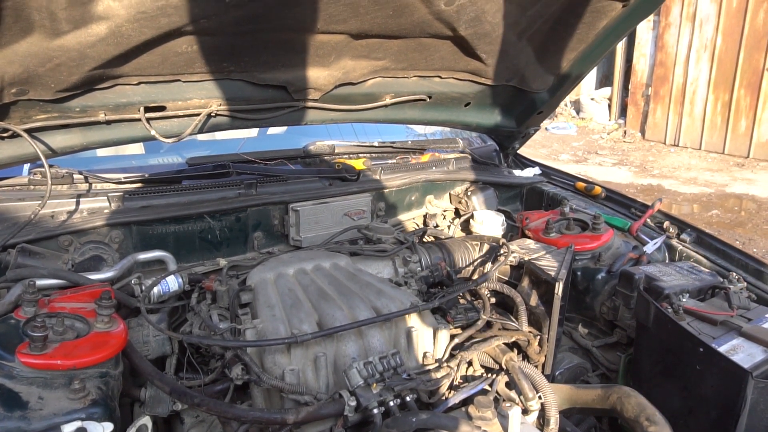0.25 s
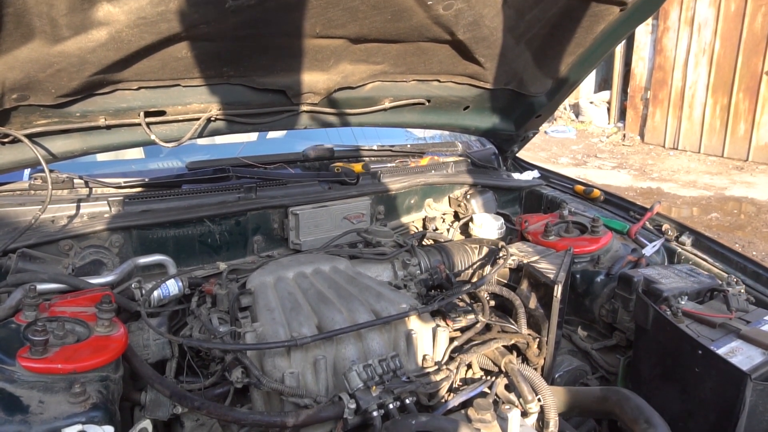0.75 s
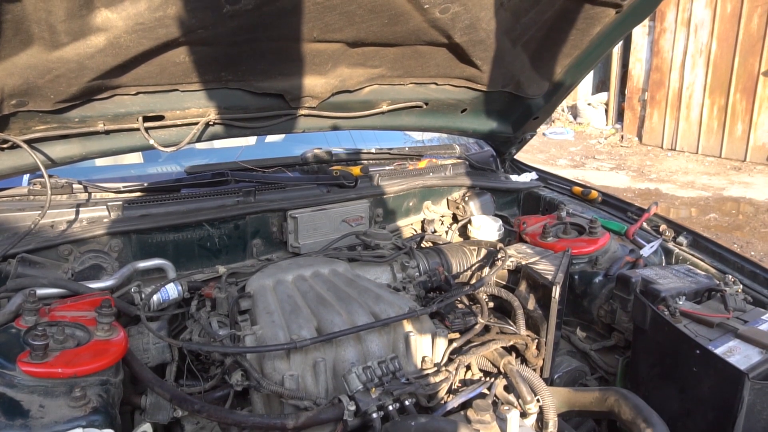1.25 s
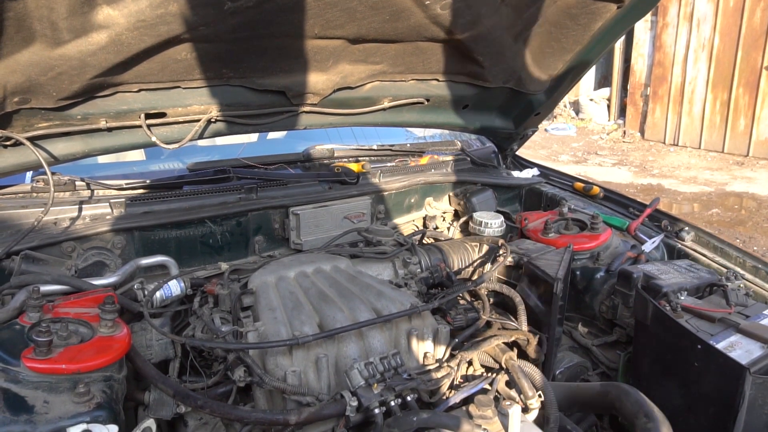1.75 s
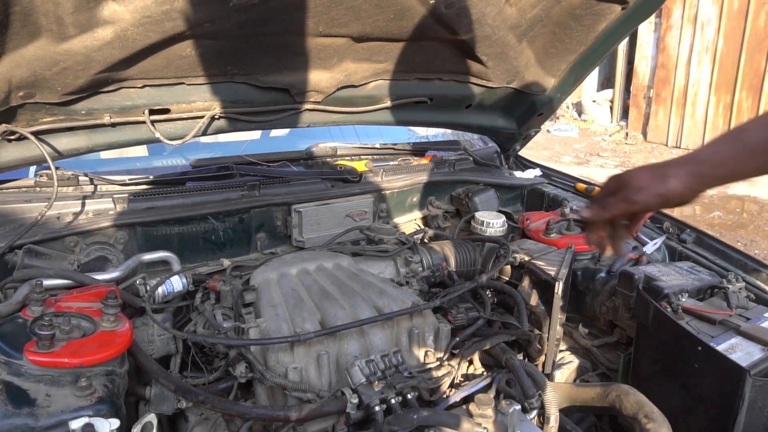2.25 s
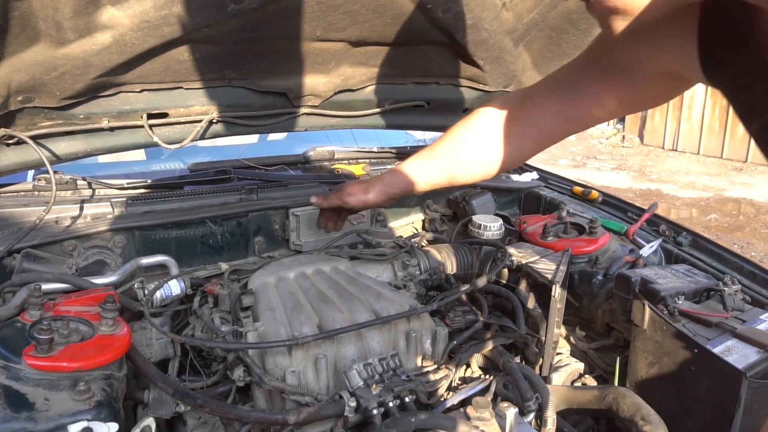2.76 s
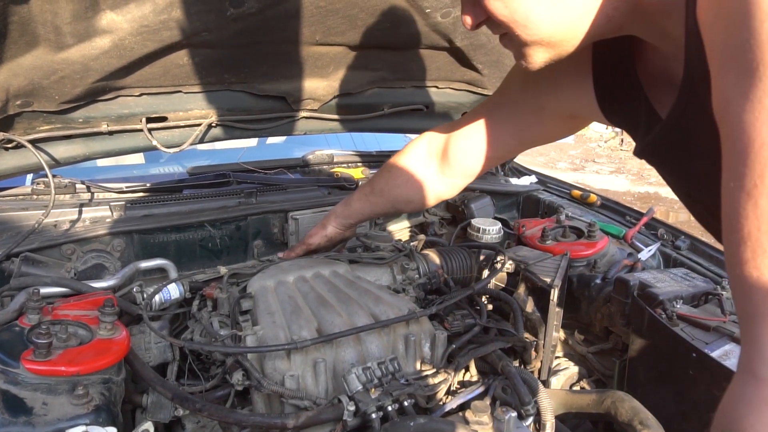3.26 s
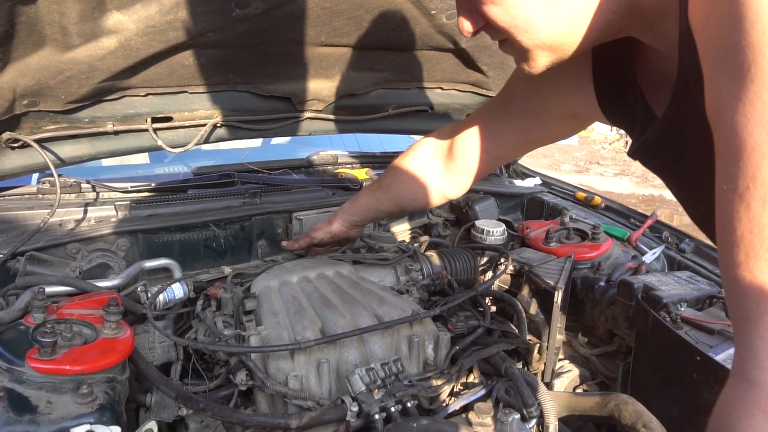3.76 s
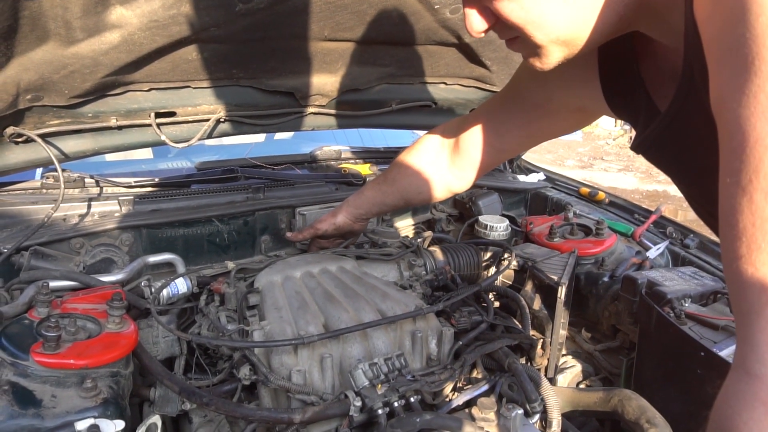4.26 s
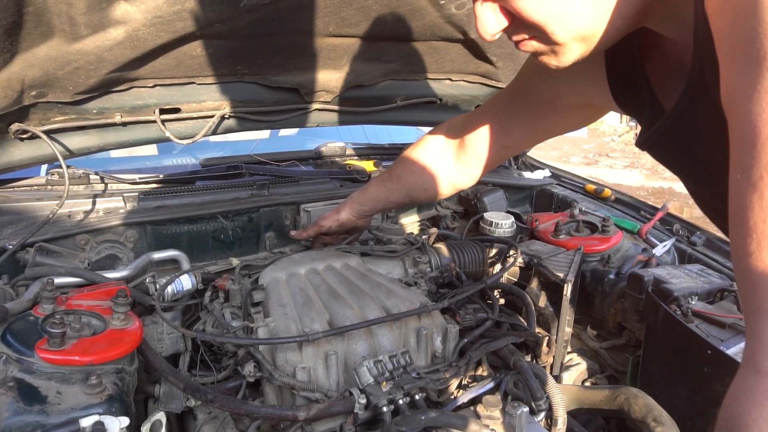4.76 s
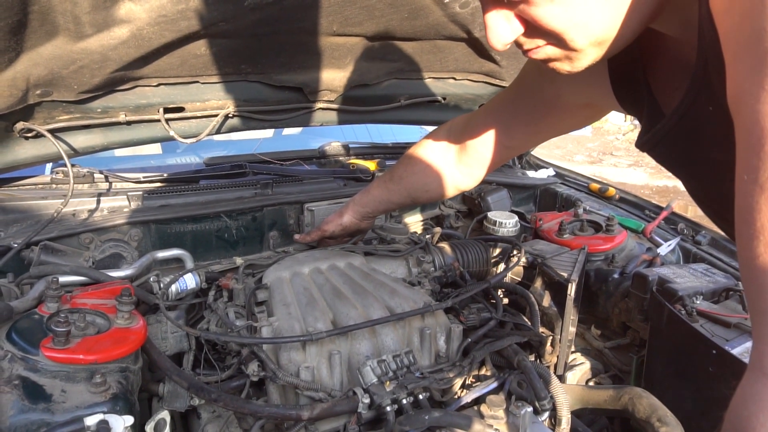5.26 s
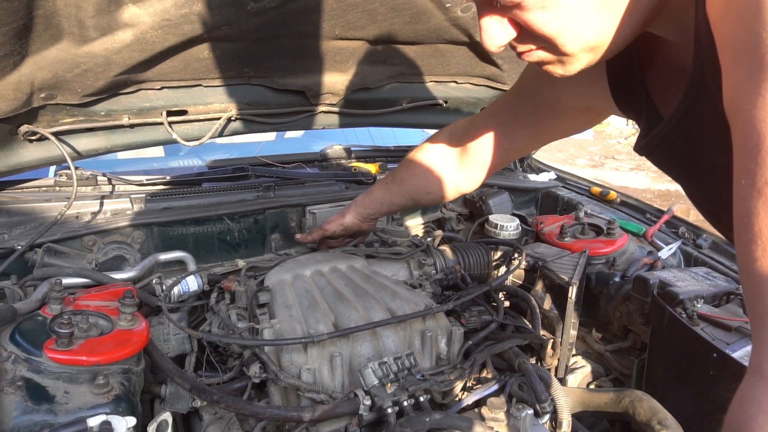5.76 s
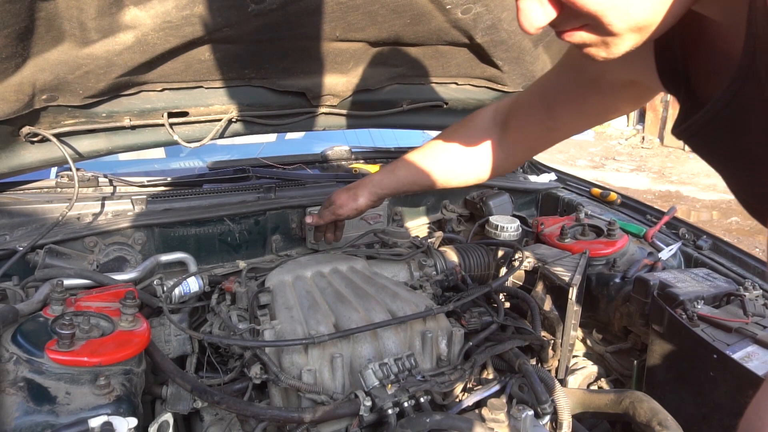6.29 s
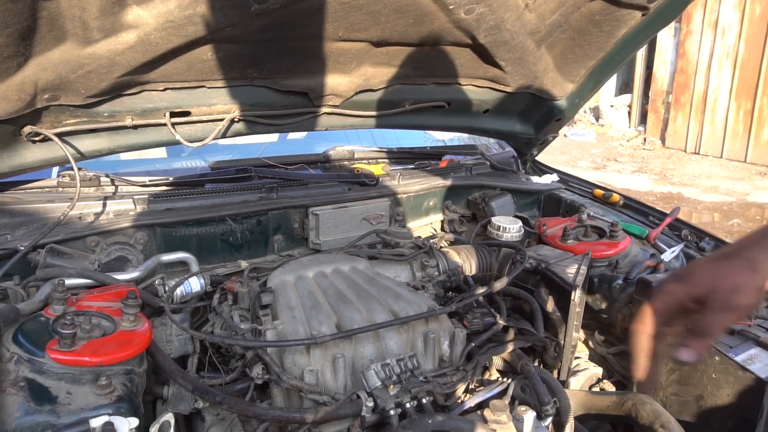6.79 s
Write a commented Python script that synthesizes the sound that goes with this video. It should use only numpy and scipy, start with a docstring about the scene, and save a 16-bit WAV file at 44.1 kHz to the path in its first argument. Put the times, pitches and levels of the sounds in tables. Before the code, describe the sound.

Heard from one close, slightly distorting microphone at an open engine bay, a car idles while its loose belt squeals with a high, wobbling whistle and a thin hiss. Past the middle the throttle opens gently and the squeal grows rough and chattering. Near the end the belt grips and goes quiet, and the engine's ticking clatter, drone and light whistling swell up in its place.

```python
"""Loose drive belt, bonnet up

Close to the open bay of an idling car, one microphone. The belt sticks and slips on its pulley, a squeal
that wobbles with every turn; as the throttle is eased open it rasps, then grips and falls silent.
The squeal overloads the microphone and holds its gain down, so the engine swells once it stops."""
import sys
import numpy as np
from scipy import signal
from scipy.fft import rfft, irfft, next_fast_len
from scipy.io import wavfile
from scipy.ndimage import uniform_filter1d

SR = 44100
rng = np.random.default_rng(int(sys.argv[2]) if len(sys.argv) > 2 else 0)


def int16_out(signal):
    """Quantize to a 16-bit WAV file."""
    q = np.round(np.clip(np.atleast_2d(signal).T, -1, 1) * 32767)
    wavfile.write(sys.argv[1], SR, q.astype(np.int16))


N = 309968
TIME = np.arange(N) / SR
IDLE_TURNS_PER_S = 10.8   # "revs" are crank turns per second above this
GRIP_S, GRIP_LENGTH_S = 6.148, .26


def from_db(db):
    """Decibels to gain."""
    return 10 ** (np.asarray(db) / 20)


def unit_rms(x):
    """Scale to unit power."""
    return x / np.sqrt(np.mean(x ** 2) + 1e-20)


def phase_of(hz):
    """Running phase in radians."""
    return 2 * np.pi * np.cumsum(hz) / SR


def ramp(start_s, length_s):
    """Rises evenly from 0 to 1 and stays there."""
    return np.clip((TIME - start_s) / length_s, 0, 1)


def bump(centre_s, width_s):
    """A bell curve in time, of height 1."""
    return np.exp(-.5 * ((TIME - centre_s) / width_s) ** 2)


def drift(hz):
    """Random wander of unit power, mostly slower than hz."""
    r = np.exp(-2 * np.pi * hz / SR)
    return unit_rms(signal.lfilter([1], [1, -2 * r, r * r], rng.standard_normal(N + SR))[SR:])


def wavering_tone(phase, waver_db, waver_hz):
    """A sine of unit power whose level wanders."""
    return unit_rms(np.sin(phase) * from_db(waver_db * drift(waver_hz)))


def coloured_noise(spectrum):
    """Noise of unit power, shaped by rows of f/Hz, level/dB."""
    hz, db = np.transpose(spectrum)
    size = next_fast_len(N)
    bins = np.maximum(np.fft.rfftfreq(size, 1 / SR), 1)
    gain = from_db(np.interp(np.log(bins), np.log(hz), db))
    return unit_rms(irfft(rfft(rng.standard_normal(size)) * gain, size)[:N])


def resonate(x, hz, width_hz):
    """A two-pole resonance."""
    r = np.exp(-np.pi * width_hz / SR)
    return signal.lfilter([1, 0, -1], [1, -2 * r * np.cos(2 * np.pi * hz / SR), r * r], x)


def filtered(x, order, hz, kind):
    """A low-, high- or band-pass filter."""
    return signal.sosfilt(signal.butter(order, hz, kind, fs=SR, output="sos"), x)


# Belt tension swinging with crank and pulleys: cycles/turn, pitch swing at idle/Hz
TENSION_SWINGS = [(.867, 13.54), (1, 27), (1.89, 34), (2, 56), (2.405, 64), (3, 20.6), (3.78, 32.73),
                  (4.24, 19.05), (5, 20.3)]
def tension_wobble(crank, speed, sag_hz=750):
    """Pitch swing in Hz, less at speed; slack lowers the tone more than tension raises it."""
    swing = sum(hz * np.sin(per_turn * crank + rng.uniform(0, 2 * np.pi))
                for per_turn, hz in TENSION_SWINGS)
    swing *= (IDLE_TURNS_PER_S / speed) ** 1.7
    return swing - (swing ** 2 - np.mean(swing ** 2)) / sag_hz


# Moments when the belt goes slack: t/s, pitch drop/Hz
SLACK_MOMENTS = [(.188, 190.2), (0.639, 230.4), (.835, 310), (1.378, 260), (1.48, 180), (1.527, 190),
                 (1.576, 170), (2.412, 270), (4.536, 230), (5.809, 270)]
def squeal_pitch(revs, grip, wobble, rasp, idle_hz=3837, sag_hz_per_rev=108, grip_rise_hz=1263):
    """The stick-slip rate sinks with revs, climbs with grip and follows the tension unless slack."""
    centre = idle_hz - sag_hz_per_rev * revs + grip_rise_hz * grip ** 1.12
    for start_s, drop_hz in SLACK_MOMENTS:
        slack = bump(start_s, width_s=.007)
        wobble = wobble * (1 - slack) - drop_hz * slack
    jitter_hz = 20 * drift(50.02) + 48 * drift(500.7) + (24 * rasp + 80 * grip) * drift(151.3)
    return centre + wobble + jitter_hz


# Echoes reaching the microphone off block, wings and bonnet: delay/s, level/dB
BAY_ECHOES = [(.0013, -2.5), (.0024, -5.5), (.0037, -6), (.0051, -5), (.0068, -4), (.0089, -6.5),
              (0.0118, -13), (.0155, -11)]
def echo_paths(sway_s=.00007):
    """Each path through the bay lengthens and shortens a little as the microphone sways."""
    return [(TIME - delay + sway_s * drift(0.91), from_db(db)) for delay, db in BAY_ECHOES]


def through_bay(size, phase, paths, window_s=0.13):
    """Echoes add to and cancel a wobbling tone, so it flutters; its mean power is held at 1."""
    echoes = sum(gain * np.interp(when, TIME, size) * np.sin(np.interp(when, TIME, phase))
                 for when, gain in paths)
    heard = size * np.sin(phase) + echoes
    return heard / np.sqrt(uniform_filter1d(heard ** 2, int(window_s * SR)) + 1e-9)


def squeal(phase, revs, grip, wobble, chop, paths, third_db=-16):
    """Three stick-slip partials; the octave grows with revs, breaks out briefly and weakens with grip."""
    octave_db = -4 + revs + 4.5 * bump(5.8, width_s=0.12) - 8 * grip
    swing = unit_rms(wobble)
    throb = from_db(0.46 * swing)   # a tighter belt sings louder
    trade = from_db(np.abs(swing))   # far off its usual pitch the fundamental yields to the octave
    partials = [(1, 0, throb / trade), (2, octave_db, throb * trade), (3, third_db, throb)]
    tone = sum(from_db(db) * through_bay(size * (1 + chop / np.sqrt(k)), k * phase, paths)
               for k, db, size in partials)
    return filtered(tone, 2, 1700, "high")   # the narrow belt radiates low side tones poorly


# Friction hiss at the pulley: f/Hz, level/dB (spectral density)
HISS_SPECTRUM = [(100, -40), (700, -1.5), (1800, -6), (4000, -6), (6000, -5), (9000, -1.5), (12000, 0),
                 (16000, -14.5)]
def friction_hiss(rasp, steady_db=-27, rasp_db=-10, flicker_db=4):
    """The sliding belt gives a flickering hiss, louder while its ribs chatter."""
    level = from_db(steady_db) + from_db(rasp_db) * rasp
    return level * coloured_noise(HISS_SPECTRUM) * from_db(flicker_db * drift(84))


def belt(crank, speed, level_db=4):
    """The slipping belt squeals, hisses and rasps, then dies away ever faster as it grips."""
    revs = speed - IDLE_TURNS_PER_S
    grip = ramp(GRIP_S, GRIP_LENGTH_S)
    rasp = rasp_depth(revs)
    wobble = tension_wobble(crank, speed)
    paths = echo_paths()
    phase = phase_of(squeal_pitch(revs, grip, wobble, rasp))
    chatter, chop = rib_chatter(revs, rasp, paths)
    sound = squeal(phase, revs, grip, wobble, chop, paths) + chatter + friction_hiss(rasp)
    fade = (np.maximum(TIME - GRIP_S, 0) / GRIP_LENGTH_S) ** 4.2
    return from_db(level_db - 29 * np.minimum(fade, 10)) * sound


# Engine clatter in the open bay: f/Hz, level/dB (spectral density)
CLATTER_SPECTRUM = [(24, -63), (40, -21), (199, -27), (276, -8), (372, -5), (570, -5), (663, -4),
                    (873, -11), (1240, -3.5), (2050, -10), (2840, -13), (3740, -15), (4680, -20),
                    (7000, -26), (16000, -41)]
# Ringing engine parts: f/Hz, bandwidth/Hz, level/dB
RINGING_PARTS = [(373, 29, -35.5), (638, 50, -29.5), (996, 200, -25.5), (1256, 26, -25.5), (1490, 270, -28),
                 (1753, 79, -33), (2852, 45, -29.5)]
def engine(crank, speed, clatter_db=-16.5, rumble_db=-32):
    """Valves tick over a low rumble; a knock once a turn, harder at speed, sets the parts ringing."""
    knock = np.exp(4 * (np.cos(crank) - 1)) * (speed / speed.max()) ** 3
    ticks = np.exp(2 * (np.cos(7 * crank) - 1))
    # half of the clatter comes back alike every two turns, which draws it into engine orders
    since_cycle_s = np.mod(crank, 4 * np.pi) / (2 * np.pi * speed)
    metal = coloured_noise(CLATTER_SPECTRUM)
    metal += coloured_noise(CLATTER_SPECTRUM)[(since_cycle_s * SR).astype(int)]
    clatter = unit_rms(metal * from_db(3 * knock + 4 * ticks))
    blows = from_db(9 * knock + 4 * ticks)
    ringing = sum(from_db(db) * unit_rms(resonate(blows * rng.standard_normal(N), hz, width_hz))
                  for hz, width_hz, db in RINGING_PARTS)
    rumble = coloured_noise([(15, -20), (40, -10), (90, -4), (200, -4), (400, -15), (1500, -60)])
    return from_db(clatter_db) * clatter + ringing + from_db(rumble_db) * rumble


# Engine drone behind the belt: cycles/turn, level at the highest speed/dB
DRONE_ORDERS = [(18.2, -32.5), (24.4, -30.5), (63.6, -28), (70.2, -27.5), (78.8, -28.5), (94, -37)]
def drone(crank, speed, db_per_rev=2):
    """Engine orders that grow with speed."""
    orders = sum(from_db(db) * wavering_tone(per_turn * crank, waver_db=-0.5, waver_hz=9)
                 for per_turn, db in DRONE_ORDERS)
    return from_db(db_per_rev * (speed - speed.max())) * orders


# Accessories whining in the bay: cycles/turn, relative level/dB
WHINE_ORDERS = [(50.5, -27), (55.3, -22), (60.4, -29.5), (92.7, -61), (98.4, -29.5), (116.2, -27)]
def accessory_whine(crank, speed, db_per_rev=-3, resonance_hz=650, half_width_hz=21):
    """The whine follows the crank, fainter with revs, and swells as it sweeps through a resonance."""
    uneven_crank = crank + phase_of(0.06 * drift(8.4))
    whine = sum(from_db(db) * wavering_tone(per_turn * uneven_crank, waver_db=2, waver_hz=12)
                for per_turn, db in WHINE_ORDERS)
    strongest_hz = max(WHINE_ORDERS, key=lambda row: row[1])[0] * speed
    swell_db = 8.5 / (1 + ((strongest_hz - resonance_hz) / half_width_hz) ** 2)
    return from_db(-1 + db_per_rev * (speed - IDLE_TURNS_PER_S) + swell_db) * whine


def rasp_depth(revs, start_s=4.525, attack_s=0.0756, end_s=6.17, release_s=.12):
    """How hard the ribs chatter, from the first revs until the belt starts to grip."""
    held = ramp(start_s, attack_s) * (1 - ramp(end_s, release_s))
    return held * (0.421 + .11 * revs)


# The chattering belt mode and its octave chop the squeal: harmonic number, relative depth
CHOP_HARMONICS = [(1, .44), (2, .24)]
def rib_chatter(revs, rasp, paths, mode_hz=1468, sag_hz_per_rev=21.89, drop_hz=128):
    """A lower belt mode: returns its own tone and the chopping that gives the squeal side tones."""
    hardest_slip = (TIME > 5.92) & (TIME < 6.17)
    hz = mode_hz - sag_hz_per_rev * revs - drop_hz * hardest_slip
    phase = phase_of(hz * (1 + .006 * drift(25.02) + .019 * drift(403)))
    tone = sum(from_db(db) * through_bay(np.ones(N), k * phase, paths) for k, db in [(1, -15), (2, -14)])
    chop = sum(depth * np.cos(k * phase) for k, depth in CHOP_HARMONICS)
    return rasp * tone, rasp * chop


# Whistles from the bay once the squeal has gone: t/s, f/Hz, level/dB
WHISTLE_ONSETS = [(6.68, 651, -22.5), (6.7, 1270, -35), (6.7, 2410, -34), (6.74, 4520, -31)]
def whistles(attack_s=0.13, jitter_hz=5):
    """Whistles set in at raised revs, each wavering about a pitch of its own."""
    sound = np.zeros(N)
    for start_s, hz, db in WHISTLE_ONSETS:
        tone = wavering_tone(phase_of(hz + jitter_hz * drift(33)), waver_db=2, waver_hz=11)
        sound += from_db(db) * ramp(start_s, attack_s) * tone
    return sound


# The crankshaft as the throttle is eased open: t/s, speed/(turns per s)
CRANK_SPEED = [(0, 10.8), (4.22, 10.78), (4.6, 12.5), (5.7, 12.5), (5.98, 14.2), (6.15, 14.25), (6.35, 16),
               (6.6, 15.6), (7.03, 15)]
def scene(knock_s=6.503):
    """At the open bay, in mono: the crankshaft drives belt, engine and accessories."""
    speed = np.interp(TIME, *np.transpose(CRANK_SPEED))
    crank = phase_of(speed)
    crank -= np.interp(knock_s, TIME, crank)   # one knock lands at knock_s
    bay = belt(crank, speed) + engine(crank, speed) + drone(crank, speed)
    return (bay + accessory_whine(crank, speed) + whistles())[None]


def gain_control(x, target_db=-6, release_db_per_s=11, window_s=0.066):
    """Loud sound pulls the microphone's gain down at once; it creeps back afterwards."""
    level_db = 10 * np.log10(np.abs(uniform_filter1d(x ** 2, int(window_s * SR))) + 1e-12)
    release_db = release_db_per_s * TIME
    held_db = np.maximum.accumulate(level_db + release_db, axis=-1) - release_db
    return x * from_db(np.minimum(target_db - held_db, 0))


def overload(x, ceiling=0.32):
    """Peaks flatten, which adds overtones and mixes the partials."""
    return x / (1 + (x / ceiling) ** 4) ** (1 / 4)


def record(dry, rumble_db=-29, rumble_band_hz=(55, 280), cutoff_hz=15750):
    """The close, overdriven microphone turns the squeal's flutter into rumble; the top is cut."""
    driven = gain_control(dry)
    power_swing = driven ** 2 - np.mean(driven[:, :SR] ** 2)
    flutter = filtered(power_swing, 2, 900, "low")
    rumble = unit_rms(filtered(flutter, 1, rumble_band_hz, "band"))
    flattened = overload(driven + from_db(rumble_db) * rumble)
    return signal.sosfiltfilt(signal.ellip(10, .05, 60, cutoff_hz, fs=SR, output="sos"), flattened)


dry = scene()
out = record(dry)
int16_out(out)
```